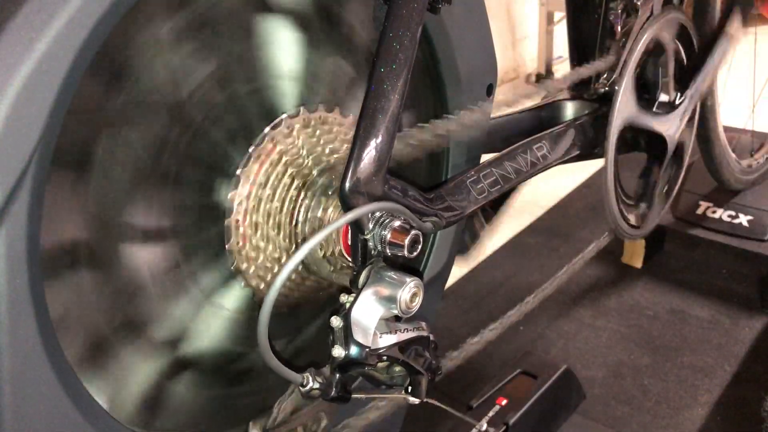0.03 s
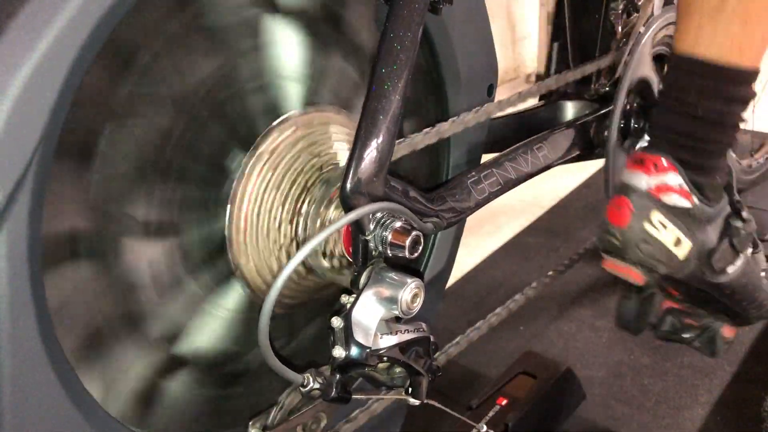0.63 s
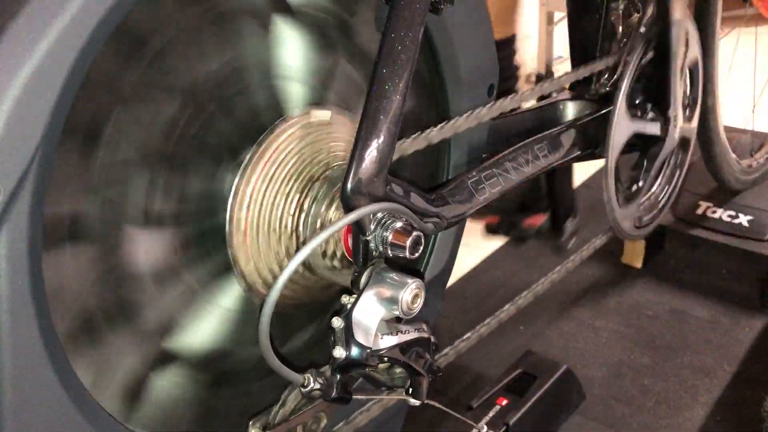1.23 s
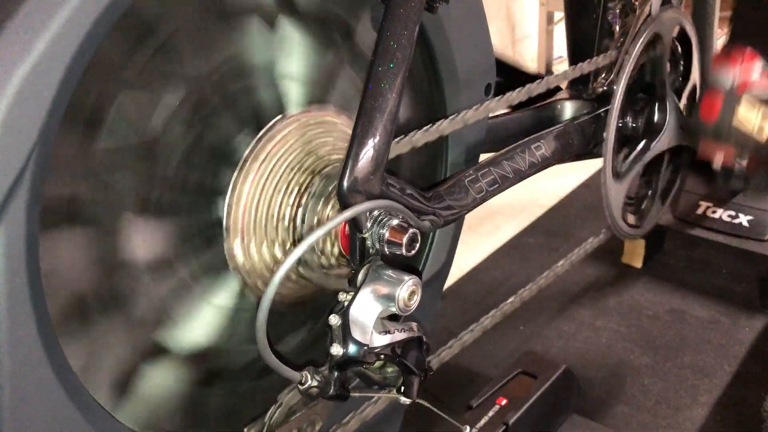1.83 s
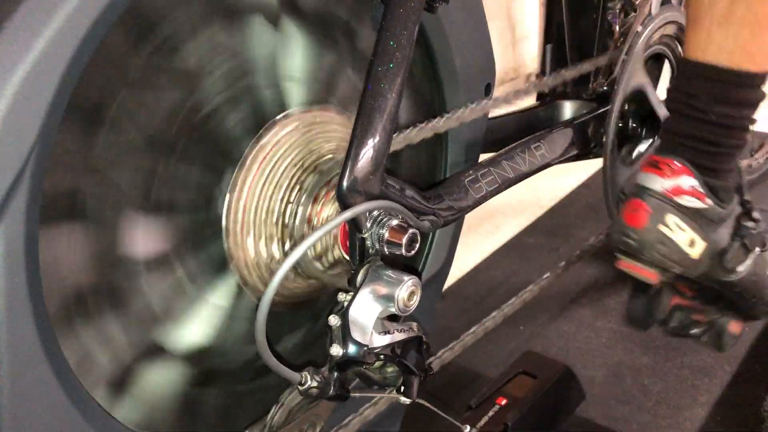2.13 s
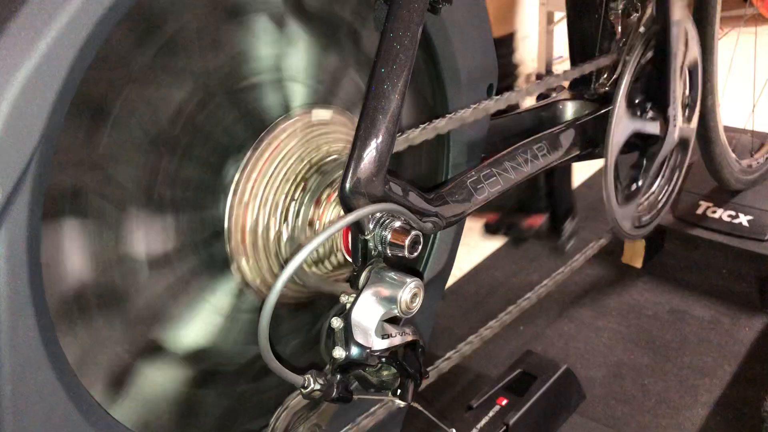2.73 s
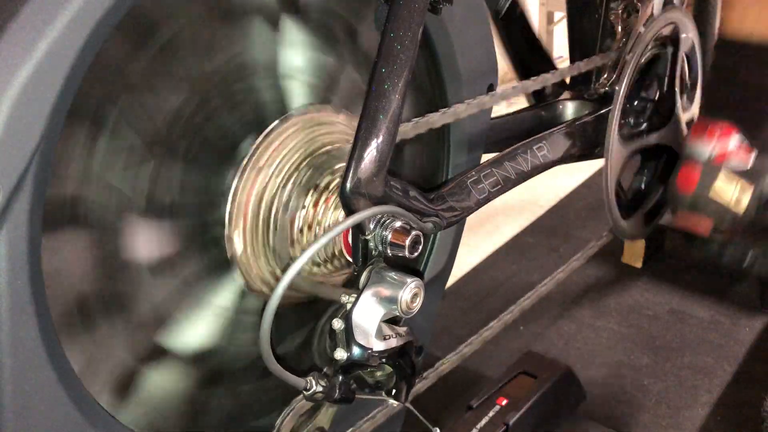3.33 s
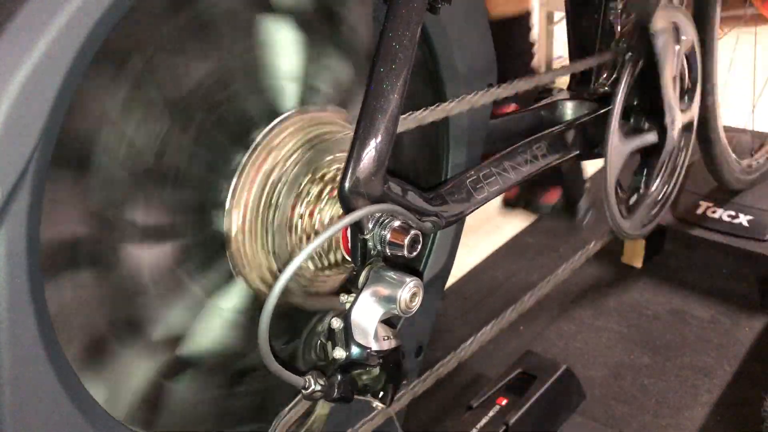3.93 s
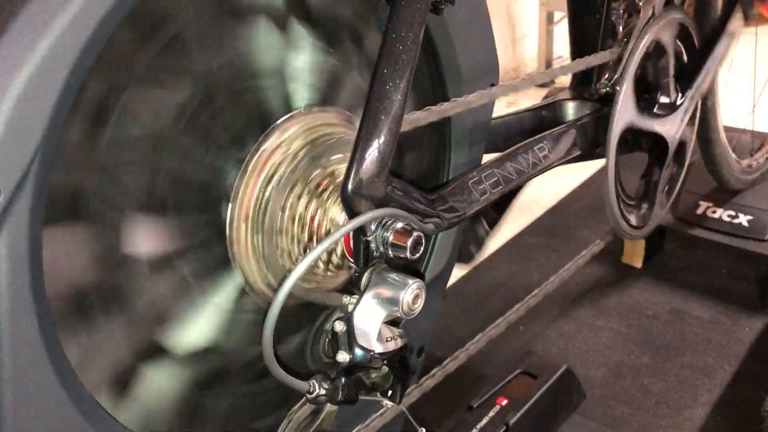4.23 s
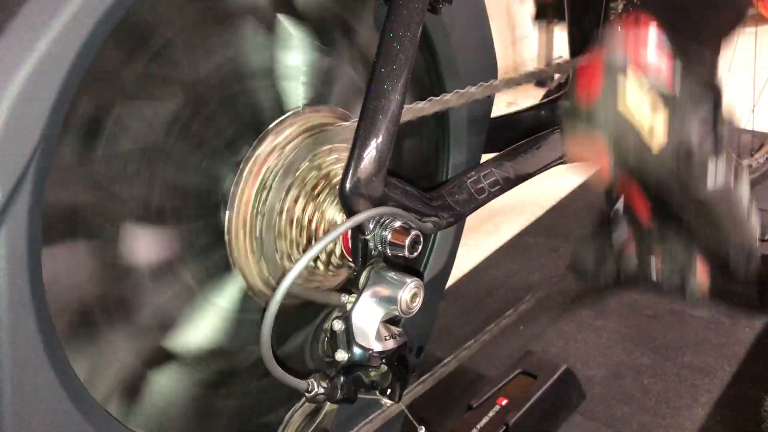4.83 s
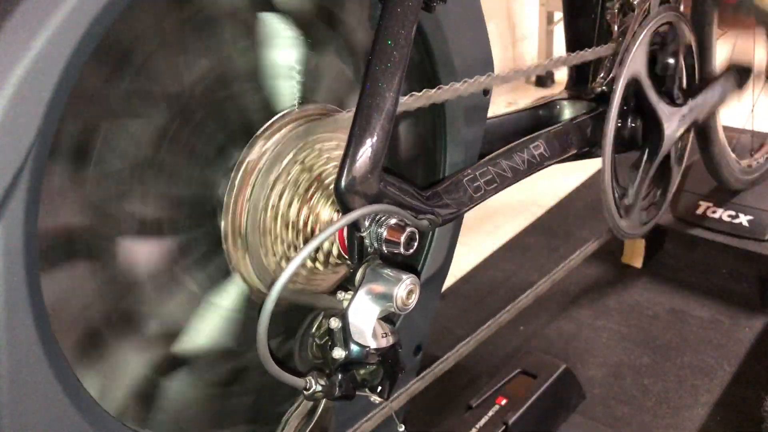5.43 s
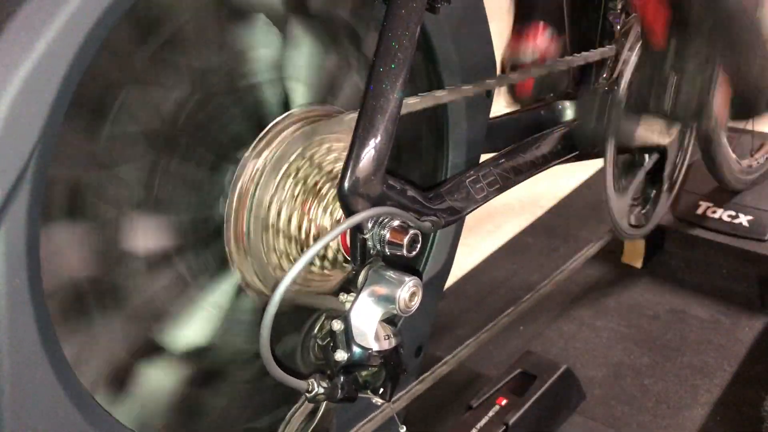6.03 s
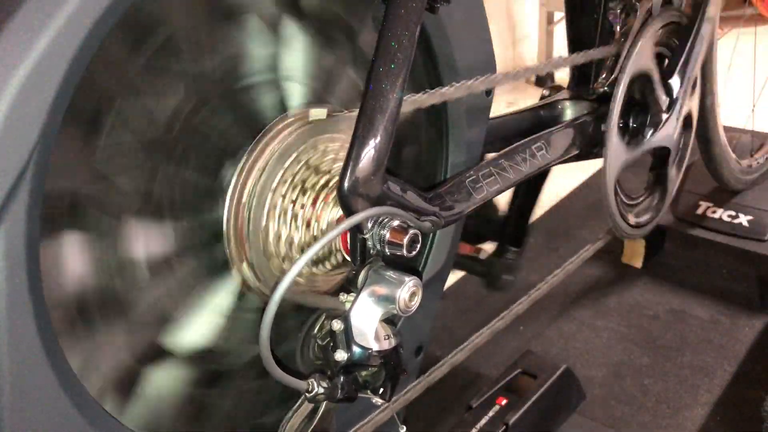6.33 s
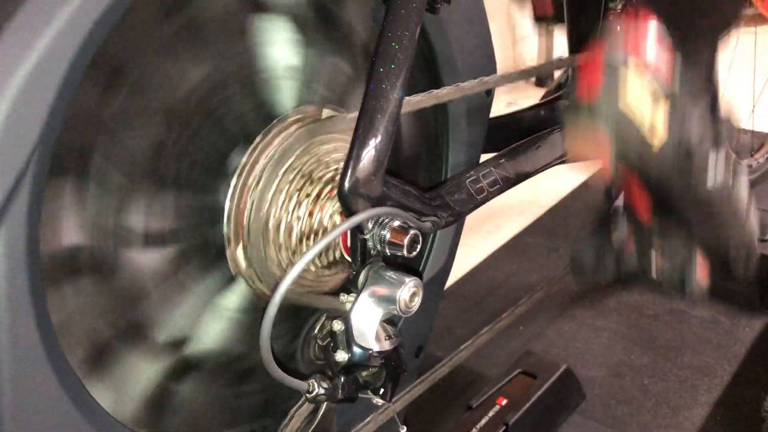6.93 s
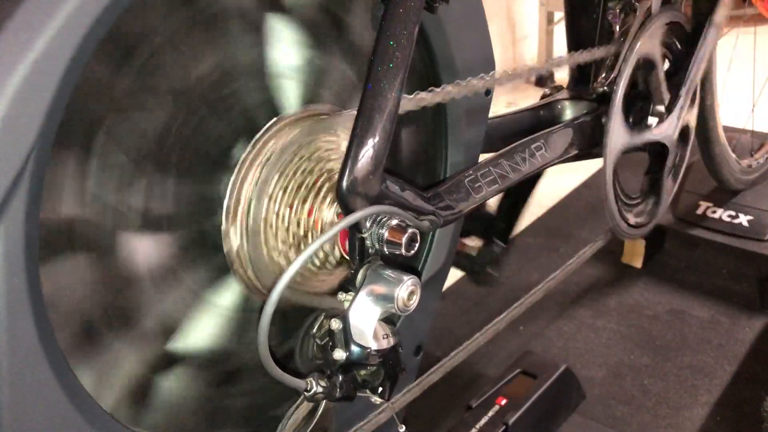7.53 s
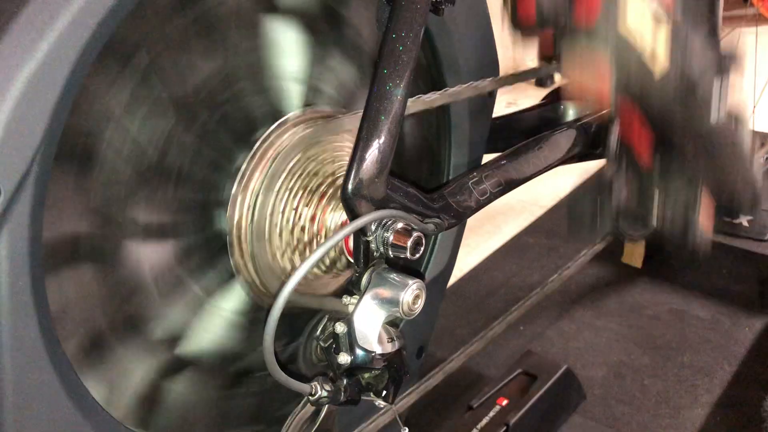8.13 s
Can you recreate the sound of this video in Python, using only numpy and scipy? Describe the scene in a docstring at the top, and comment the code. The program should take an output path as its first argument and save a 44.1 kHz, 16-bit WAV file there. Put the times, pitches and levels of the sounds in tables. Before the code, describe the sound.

A bicycle chain ticks over the whir of an indoor trainer. Almost at once a hard metal knock cuts the microphone out, leaving only loud, clipped pops for nearly two seconds. The sound returns and the pedalling quickens, the chain repeatedly catching and dropping with knocks, clinks and derailleur chatter. It briefly runs smoothly near the end, then catches again. The microphone is right beside the rear gears in a small room.

```python
"""A road bicycle on an indoor trainer in a small room, one microphone beside the rear derailleur.
From the start the chain ticks link by link over the whir of the flywheel. Almost at once a hard
knock overloads the microphone: it sticks for nearly two seconds and only pops. When it clears, the
pedalling quickens and the badly indexed chain keeps catching on the next sprocket and dropping back,
knocking the cassette and setting the derailleur chattering. Near the end it briefly runs true."""
import sys
import numpy as np
from scipy import signal
from scipy.fft import rfft, irfft, next_fast_len
from scipy.io import wavfile
from scipy.ndimage import uniform_filter1d

SR = 44100
rng = np.random.default_rng(int(sys.argv[2]) if len(sys.argv) > 2 else 0)


def file_out(sig):
    """Save sig as 16-bit WAV at sys.argv[1]."""
    # one column per channel
    cols = np.atleast_2d(sig).T
    # limit, then scale
    lim = np.clip(cols, -1, 1)
    pcm = np.round(lim * 32767).astype(np.int16)
    wavfile.write(sys.argv[1], SR, pcm)


N = 361179
TIME = np.arange(N) / SR
BLOW_TIME = TIME[:SR // 4]

# The flywheel's hum. Each row: pitch in Hz, level in dB.
FLYWHEEL_TONES = [(131, -55), (271, -52.5), (1130, -50)]
# The drive belt, faint throughout, sings louder and lower as the load eases near the end.
# Each row: time in seconds, pitch in Hz, level in dB.
BELT_SONG = [(7.05, 835, -47), (7.17, 811, -43), (7.38, 794, -41.5), (7.52, 762, -41)]
# Tone colours of the floor and the rolling trainer. Each row: frequency in Hz, gain in dB.
FLOOR_COLOUR = [(12, -12), (25, 7.5), (48, -2.5), (80, -11), (130, -7), (200, -15), (600, -46), (4000, -71)]
WHIR_COLOUR = [(70, -29), (130, -10), (195, -13), (265, -8.5), (350, -12), (455, -4), (560, -8.5),
               (700, -7), (850, -3.5), (1080, -1), (1400, -8.5), (1650, -17.5), (2200, -18.5),
               (2800, -24.5), (16000, -44)]

# The pace of the chain. Each row: time in seconds, links passing per second.
CHAIN_SPEED = [(0.0, 23.74), (2.1, 28.38), (2.64, 29.51), (2.93, 28.98), (3.47, 33.19), (3.67, 33.17),
               (3.93, 32.03), (4.33, 34.7), (4.9, 34.38), (5.1, 36.81), (5.59, 37.85), (6.3, 34.92),
               (6.47, 36.81), (6.7, 40.56), (6.87, 41.09), (7.36, 39.29), (7.5, 37.42), (7.9, 41.23)]
# Shifting moves each contact within the link cycle. Each row: time in seconds, lag in links at the
# sprocket, at the chainring and at the pulley, crossfade from rattle (0) to pulley scrape (1).
SHIFTING = [(2.15, .91, .01, .47, .85), (2.7, .91, .01, .8, .85), (3.6, .91, .01, .72, .3),
            (5.0, .91, .01, .72, .3), (5.35, .76, .1, 1.01, .08)]
# Rollers seat harder as the chain crosses the cassette. Each row: time in seconds, coasting level in dB.
SEATING_LEVELS = [(2.5, -62), (3.3, -60), (4.8, -54.5), (5.3, -49.5), (6.15, -54.5), (6.95, -49.5),
                  (7.7, -51.5)]
# Tone colours of the running chain, heard close. Each row: frequency in Hz, gain in dB.
SEATING_COLOUR = [(1000, -19.5), (3800, -26), (4600, 3.5), (5400, 6), (6300, -10), (8000, -12), (9000, -3),
                  (10000, -15), (16000, -38.5)]
RATTLE_COLOUR = [(1000, 6.5), (2200, -3), (2900, 2.5), (3750, 9), (4400, 3), (7000, 1), (8900, -1.5),
                 (10500, -0.5), (13500, -6), (16000, -19.5)]
SCRAPE_COLOUR = [(2000, -15), (7000, -5), (9300, -8), (10300, 5), (11300, -5), (13000, 1.5), (16000, -9.5)]

# The chain rides up a tooth and drops. Each row: time in seconds, then levels in dB of the
# cassette knock, the derailleur ring and the link clink before its colouring.
CHAIN_DROPS = [(.062, -7, -21.5, -28.5), (.105, -11.5, -18.5, -18), (.115, -4, -11, -24),
               (1.978, -26, -42, -53), (2.149, -10, -25, -25.5), (2.156, -5.5, -13, -25),
               (2.17, -18.5, -22.5, -42), (2.209, -28, -55, -37), (2.278, -42, -39, -48),
               (2.582, -19.5, -24, -28.5), (2.659, -23, -23, -32), (2.937, -8.5, -17.5, -36),
               (2.949, -6, -15, -30), (2.979, -5, -25, -21), (2.989, -14.5, -17.5, -35),
               (3.177, -25.5, -42, -42), (3.233, -24.5, -28.5, -34), (3.264, -9.5, -19.5, -21),
               (3.287, -18, -23.5, -26), (3.335, -25, -28, -44), (3.48, -26, -39, -43),
               (3.502, -11.5, -23.5, -36.5), (3.581, -15, -37, -48), (4.025, -19, -24, -21.5),
               (4.076, -10, -19.5, -21), (4.099, -12.5, -20, -17.5), (4.346, -13, -18, -39),
               (4.432, -16.5, -19, -36), (4.999, -55, -55, -35.5), (5.081, -33, -55, -36),
               (5.149, -23, -50, -42), (5.263, -26, -35.5, -42), (5.31, -17.5, -44, -57),
               (5.349, -11, -25.5, -31.5), (5.361, -28, -44, -34.5), (5.454, -14, -30, -40),
               (5.669, -23.5, -27, -48), (5.94, -22.5, -30.5, -48), (6.44, -20.5, -29, -37),
               (6.494, -17.5, -24.5, -36.5), (6.649, -14, -22.5, -39.5), (6.699, -20, -29.5, -34.5),
               (6.844, -25, -45.5, -64), (6.895, -27.5, -44, -43), (7.299, -65, -56, -41),
               (7.512, -7, -20.5, -38.5), (7.581, -25.5, -39, -64), (7.657, -16, -25, -30),
               (7.705, -17.5, -25.5, -43), (7.735, -17.5, -20.5, -40), (7.785, -24.5, -37, -48),
               (7.832, -18, -25, -43), (8.031, -18, -33, -47)]
# Spells in which link after link nicks the next sprocket.
# Each row: start in seconds, end in seconds, then the same three levels in dB.
GRINDING_SPELLS = [(2.483, 2.70, -29.5, -39.5, -35), (3.958, 4.13, -30, -38.5, -40),
                   (5.321, 5.575, -24.5, -29.5, -46.5), (6.048, 6.09, -26, -37.5, -68),
                   (6.354, 6.425, -25, -29.5, -47), (6.676, 6.76, -26, -32.5, -46),
                   (6.946, 7.055, -24, -32, -45.5), (8.008, 8.14, -28, -33, -48)]
# Modes of the struck parts. Each row: frequency in Hz, relative level in dB, seconds to fall 60 dB.
CASSETTE_MODES = [(707, -20, 0.0073), (814.7, 2, 0.078), (949.6, 14.5, 0.03), (1062, 9.5, 0.027),
                  (1274, 1, 0.043), (1327, -14.5, 0.06), (1870, -7.5, 0.046)]
DERAILLEUR_MODES = [(1920, -8, 0.046), (2324, -10.5, 0.061), (2587, -10, 0.017), (2926, 0.5, 0.018),
                    (3000, 3.5, 0.04), (2940, -11.5, 0.025), (3660, -18, 0.02)]
FRAME_MODES = [(84.6, -22.5, 0.033), (145.7, -4, 0.2), (190, -19.5, 0.22), (280.8, -3, 0.38),
               (363.6, 5.5, 0.056), (457, 13, 0.034), (616, -0.5, 0.079)]
LINK_PLATE_MODES = [(10200, -2.5, 0.048), (10578, -4, .06), (12150, 0, 0.036), (12200, -2, 0.035),
                    (13400, -4.5, 0.057)]
STAND_MODES = [(93, -16, 0.25), (119.4, 9, 0.39), (153, -3, 0.67), (176, 3.5, 0.29)]
# The slack chain snaps taut and jolts the stand. Each row: start in seconds, level in dB.
STAND_JOLTS = [(0.065, -16.5), (2.155, -22.5), (2.951, -17.5), (3.27, -25), (3.504, -25.5), (4.345, -19.5),
               (4.432, -23), (5.94, -27), (7.51, -21)]
# Side plates rub along the next sprocket. Each row: start in seconds, end in seconds, level in dB.
PLATE_RUBS = [(.085, .115, -41), (2.47, 2.686, -44), (3.17, 3.296, -46.5), (3.93, 4.122, -46.5),
              (5.076, 5.15, -48)]
# Tone colours of clinking links and rubbing plates. Each row: frequency in Hz, gain in dB.
CLINK_COLOUR = [(300, -15.5), (1500, 3.5), (2500, 6.5), (4500, 2.5), (6000, 3), (8000, 5), (10300, 4.5),
                (13500, 2), (16000, -9.5)]
RUB_COLOUR = [(1500, -14), (3500, 9), (6000, 4), (10300, -2), (13500, -13), (16000, -10)]

# Pops of the stuck microphone. Each row: start in seconds, voltage before clipping (1 is full scale),
# leak time in seconds, rise time in milliseconds.
MICROPHONE_POPS = [(.1215, -.84, .0825, .04), (.5216, 1.67, .0825, .09), (.6586, -1.36, .0825, .06),
                   (.9351, 3.5, .043, .9), (1.1176, .54, .08, .03), (1.2069, -1.5, .0825, .04),
                   (1.2729, .99, .0825, .035)]

CLIMB_S = .005  # a link climbs this long before it drops
RECOVERY_S = 1.86  # the microphone comes back


def amp(db):
    """Decibels to gain."""
    return 10 ** (np.asarray(db) / 20)


def unit(x):
    """Scale to rms 1."""
    return x / np.sqrt(np.mean(x ** 2))


def curves(table):
    """Each column of a table, joined by straight lines in time and held at both ends."""
    times, *columns = np.transpose(table)
    return [np.interp(TIME, times, column) for column in columns]


def add(track, start_s, sound):
    """Mix a sound into a track."""
    start = max(int(start_s * SR), 0)
    span = track[start:start + len(sound)]
    span += sound[:len(span)]


def colour(x, points):
    """Minimum-phase filter through (Hz, dB) points: nothing sounds ahead of a strike."""
    size = next_fast_len(len(x) + 4096) // 2 * 2
    hz, db = np.transpose(points)
    bin_hz = np.arange(size // 2 + 1) * SR / size
    gain = amp(np.interp(np.log(bin_hz + 1), np.log(hz), db))
    cepstrum = irfft(np.log(gain))
    cepstrum[1:size // 2] *= 2
    cepstrum[size // 2 + 1:] = 0
    return irfft(rfft(x, size) * np.exp(rfft(cepstrum)))[:len(x)]


def drift(rate_hz):
    """A random drift of rms 1 that turns about rate_hz times a second."""
    hold = int(SR / rate_hz)
    steps = np.repeat(rng.standard_normal(N // hold + 1), hold)
    return unit(uniform_filter1d(steps, hold)[:N])


def wavering_tone(hz, db):
    """A tone that wanders around its pitch and rms level."""
    level = amp(db + 2.9 * drift(7.6))
    pitch_hz = hz * (1 + .012 * drift(30))
    return level * np.sqrt(2) * np.sin(2 * np.pi * np.cumsum(pitch_hz) / SR)


def trainer():
    """The bed of the scene: the flywheel hums, the belt sings and the floor shakes."""
    hum = sum(wavering_tone(hz, db) for hz, db in FLYWHEEL_TONES)
    belt = wavering_tone(*curves(BELT_SONG))
    rumble = amp(-42) * unit(colour(rng.standard_normal(N), FLOOR_COLOUR))
    return hum + belt + rumble


def link_ticks(links, limp, jitter_s, scatter_db, decay_s):
    """One gritty tick per passing link; inner and outer links come early and late in turn."""
    number = np.arange(1, int(links[-1]) + 1)
    times = np.interp(number + limp * (-1) ** number, links, TIME)
    envelope = np.zeros(N)
    tick = (1 - np.exp(-BLOW_TIME / .0007)) * np.exp(-BLOW_TIME / decay_s)
    for start_s, (late, size) in zip(times, rng.standard_normal((len(times), 2))):
        add(envelope, start_s + jitter_s * late, amp(scatter_db * np.clip(size, -2, 2)) * tick)
    return unit(envelope * rng.standard_normal(N))


def drivetrain():
    """Each link scrapes a pulley, seats on a sprocket and meets the chainring; the trainer whirs below."""
    link_hz, = curves(CHAIN_SPEED)
    seating_db, = curves(SEATING_LEVELS)
    sprocket_lag, chainring_lag, pulley_lag, pulley_share = curves(SHIFTING)
    links = np.cumsum(link_hz) / SR
    sprocket = link_ticks(links - sprocket_lag, limp=.01, jitter_s=.0004, scatter_db=2, decay_s=.0018)
    chainring = link_ticks(links - chainring_lag, limp=.07, jitter_s=.0008, scatter_db=3, decay_s=.0022)
    pulley = link_ticks(links - pulley_lag, limp=.06, jitter_s=.0012, scatter_db=3.5, decay_s=.0013)

    sliding = amp(3 * drift(100)) * rng.standard_normal(N)
    seating = unit(colour(sprocket + amp(-11.5) * chainring + amp(-10.5) * sliding, SEATING_COLOUR))
    rattle = unit(colour(sprocket + amp(-1.5) * chainring + amp(-22) * sliding, RATTLE_COLOUR))
    rattle *= np.sqrt(1 - pulley_share)
    scrape = unit(colour(pulley, SCRAPE_COLOUR)) * np.sqrt(pulley_share)
    chain = amp(seating_db) * seating + amp(-50) * rattle + amp(-53) * scrape
    rolling = amp(3.1 * drift(30)) * rng.standard_normal(N)
    whir = unit(colour(rolling + amp(-12.5) * sprocket + amp(-3.5) * chainring, WHIR_COLOUR))

    # Pushing on the pedals speeds the chain up and loads every part; running true quietens them.
    push_hz_per_s = uniform_filter1d(np.gradient(link_hz) * SR, size=SR // 6)
    running_true = np.interp(TIME, [7.12, 7.2, 7.43, 7.51], [0, 1, 1, 0])
    chain_gain_db = .037 * push_hz_per_s - 11 * running_true
    whir_db = -36 + .0178 * push_hz_per_s - 1.5 * running_true
    return amp(chain_gain_db) * chain + amp(whir_db) * whir


def contact(rise_s, decay_s):
    """Rough metal meeting metal: a short burst of random force."""
    envelope = (1 - np.exp(-BLOW_TIME / rise_s)) * np.exp(-BLOW_TIME / decay_s)
    return envelope * rng.standard_normal(len(BLOW_TIME))


def ring(force, modes, detune):
    """Damped modes answer a force; each blow lands elsewhere and shifts them a little."""
    hz, db, t60_s = np.transpose(modes)[:, :, None]
    hz = hz * (1 + detune * rng.standard_normal(hz.shape))
    partials = amp(db - 60 * BLOW_TIME / t60_s) * np.sin(2 * np.pi * hz * BLOW_TIME)
    return signal.fftconvolve(force, partials.sum(axis=0))[:len(BLOW_TIME)]


def blow(x, db):
    """Give a blow the energy of 10 ms at this level."""
    return x * amp(db) * np.sqrt(SR / 100 / np.sum(x ** 2))


def chatter(gap_s, loss_db, scatter_db, count):
    """The chain bounces a few times at nearly even gaps, losing strength."""
    force = np.zeros(len(BLOW_TIME))
    for bounce, (late, size) in enumerate(rng.standard_normal((count, 2))):
        add(force, (bounce + .21 + .17 * late) * gap_s, amp([scatter_db * size - loss_db * bounce]))
    return force


def chain_catch(knock_db, ring_db, clink_db):
    """A link grates up a tooth and drops. Returns the body (cassette, derailleur, frame) and the clink."""
    body, clink = np.zeros((2, len(BLOW_TIME)))
    climb = contact(rise_s=.0037, decay_s=.0019)
    add(body, 0, blow(ring(climb, CASSETTE_MODES, detune=.023), knock_db - 22.5))
    add(clink, 0, blow(climb, clink_db - 13))

    bounces = chatter(gap_s=.0043, loss_db=5, scatter_db=2, count=4)
    grinding = signal.fftconvolve(bounces, contact(rise_s=.00085, decay_s=.0018))[:len(BLOW_TIME)]
    strike = blow(contact(rise_s=.00034, decay_s=.0017), 0) + blow(grinding, -6)
    thump = ring(contact(rise_s=.004, decay_s=.013), FRAME_MODES, detune=.054)
    add(body, CLIMB_S - .0009, blow(ring(strike, CASSETTE_MODES, detune=.05), knock_db))
    add(body, CLIMB_S, blow(ring(grinding, DERAILLEUR_MODES, detune=.0071), ring_db))
    add(body, CLIMB_S, blow(thump, -20.5 + .42 * knock_db))  # the thump grows less than the knock

    click = blow(contact(rise_s=.0019, decay_s=.0014), clink_db)
    add(clink, CLIMB_S - .0006, click + blow(grinding, clink_db - 17))
    add(clink, CLIMB_S, blow(ring(strike, LINK_PLATE_MODES, detune=.003), clink_db - 17.5))
    return body, clink


def catches():
    """The drops and grinding spells of the badly indexed chain, right beside the microphone."""
    bodies, clinks = np.zeros((2, N))
    for time_s, knock_db, ring_db, clink_db in CHAIN_DROPS + nicks():
        body, clink = chain_catch(knock_db, ring_db, clink_db)
        add(bodies, time_s - CLIMB_S, body)
        add(clinks, time_s - CLIMB_S, clink)
    return bodies + colour(clinks, CLINK_COLOUR)


def stand_jolts():
    """The trainer stand booms briefly as the chain snaps taut."""
    booms = np.zeros(N)
    for start_s, db in STAND_JOLTS:
        boom = ring(contact(rise_s=.0016, decay_s=.0032), STAND_MODES, detune=.0764)
        add(booms, start_s, blow(boom, db))
    return booms


def plate_rubs(attack_s=.0027, release_s=.039):
    """Steel slides on steel: a gritty hiss that starts at once, holds and dies away."""
    pressure = sum(amp(db) * np.interp(TIME, [start, start + attack_s, end, end + release_s], [0, 1, 1, 0])
                   for start, end, db in PLATE_RUBS)
    grit = amp(6.3 * drift(430)) * rng.standard_normal(N)
    return pressure * unit(colour(grit, RUB_COLOUR))


def stuck_microphone(swell_s=.13):
    """The voltage jumps between its rails; each jump leaks away, and a slow swell ends the fault."""
    voltage = np.zeros(N)
    for start_s, jump, leak_s, rise_ms in MICROPHONE_POPS:
        age_s = np.maximum(TIME - start_s, 0)
        switched = np.minimum(1000 * age_s / rise_ms, 1)
        voltage = voltage * (1 - switched) + switched * jump * np.exp(-age_s / leak_s)
    swell_age = np.maximum(TIME - RECOVERY_S, 0) / swell_s
    return voltage - .19 * swell_age * np.exp(1 - swell_age)


def nicks(max_links=12, scatter_db=1.5):
    """In a grinding spell each passing link strikes a little differently. Returns rows like CHAIN_DROPS."""
    link_hz, = curves(CHAIN_SPEED)
    links = np.cumsum(link_hz) / SR
    drop_times = np.transpose(CHAIN_DROPS)[0]
    rows = []
    for start_s, end_s, *spell_db in GRINDING_SPELLS:
        passing = np.interp(start_s, TIME, links) + np.arange(max_links)
        times = np.interp(passing, links, TIME)
        levels = np.array(spell_db) + scatter_db * rng.standard_normal((max_links, 3))
        for time_s, db in zip(times, levels):
            clear_of_drops = np.min(np.abs(time_s - drop_times)) > .008  # a dropping link does not nick
            if time_s < end_s and clear_of_drops:
                rows.append((time_s, *db))
    return rows


def room(direct, t60_s, wet_db):
    """A small furnished room returns a short, dull tail 7 ms behind the direct sound."""
    tail = rng.standard_normal(len(BLOW_TIME)) * amp(-60 * BLOW_TIME / t60_s) * (BLOW_TIME > .007)
    tail = colour(tail, [(150, -3), (1200, -3.5), (2900, -16), (6000, -2), (12000, -12)])
    tail /= np.sqrt(np.sum(tail ** 2))
    return direct + amp(wet_db) * signal.fftconvolve(direct, tail)[:N]


def scene():
    """From beside the derailleur, in mono: the bicycle close and nearly dry over the trainer's hum."""
    bed = trainer()
    bicycle = drivetrain() + plate_rubs() + stand_jolts() + catches()
    return bed + room(bicycle, t60_s=.32, wet_db=-20)[None]


def record(dry):
    """The microphone is deaf while it is stuck; the input clips hard and the top is cut."""
    ceiling, top_hz = .7, 16100
    stuck_s = MICROPHONE_POPS[0][0]
    alive = (TIME < stuck_s) + np.clip((TIME - RECOVERY_S) / .018, 0, 1)
    voltage = dry * alive + stuck_microphone()
    clipped = voltage / (1 + (voltage / ceiling) ** 12) ** (1 / 12)
    lowpass = signal.ellip(8, .2, 70, top_hz, fs=SR, output="sos")
    return signal.sosfilt(lowpass, clipped)


dry = scene()
out = record(dry)
file_out(out)
```